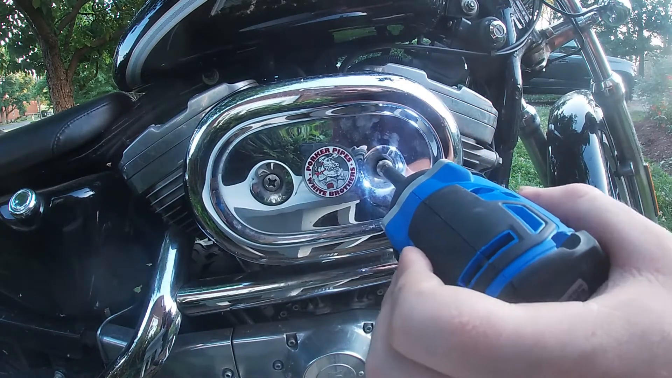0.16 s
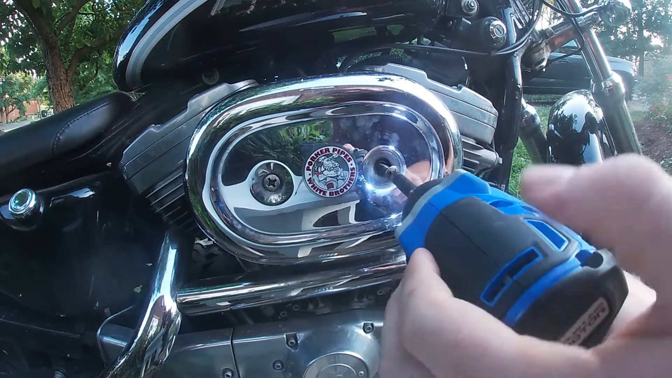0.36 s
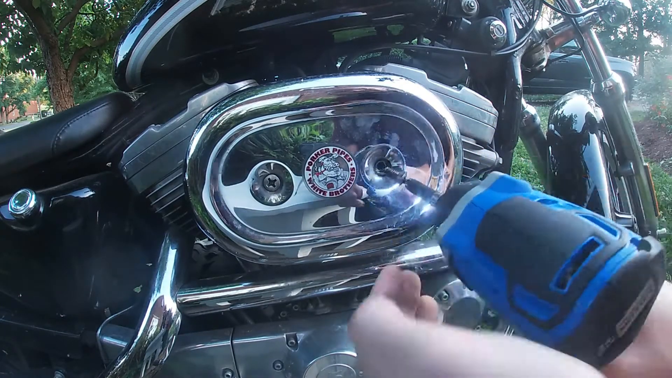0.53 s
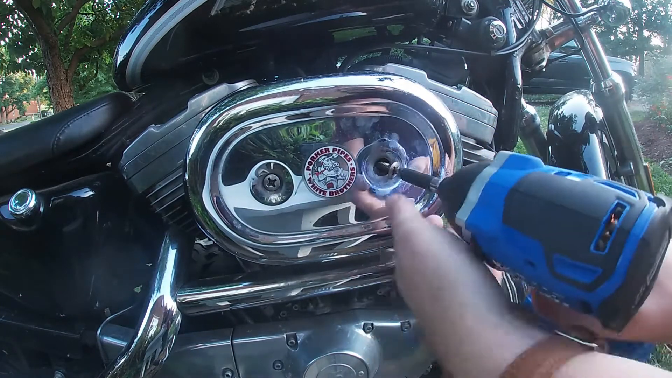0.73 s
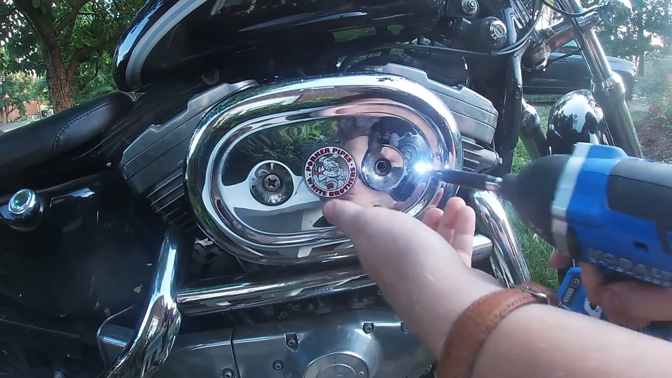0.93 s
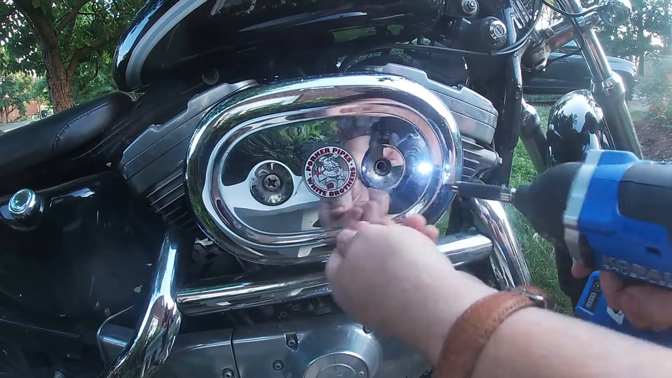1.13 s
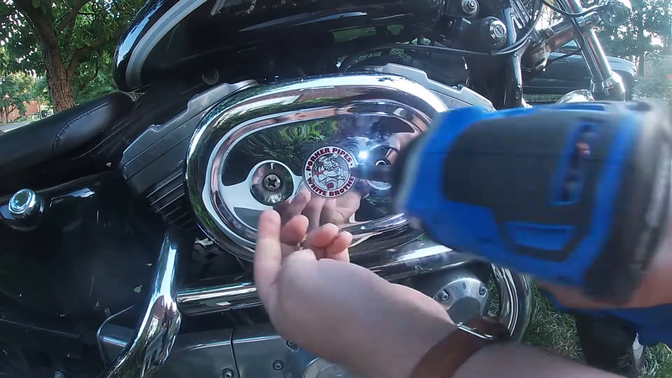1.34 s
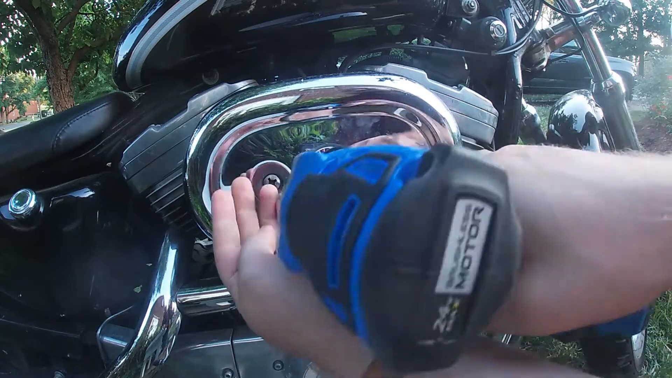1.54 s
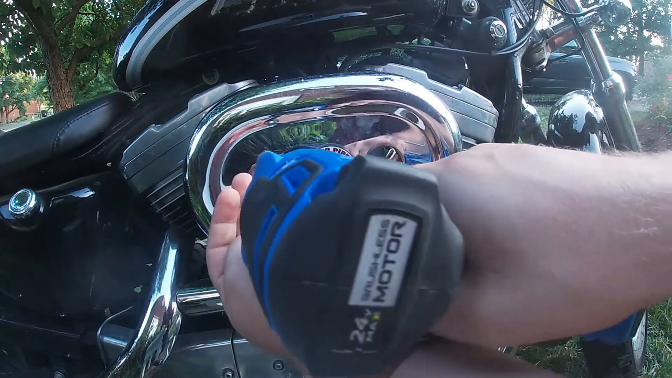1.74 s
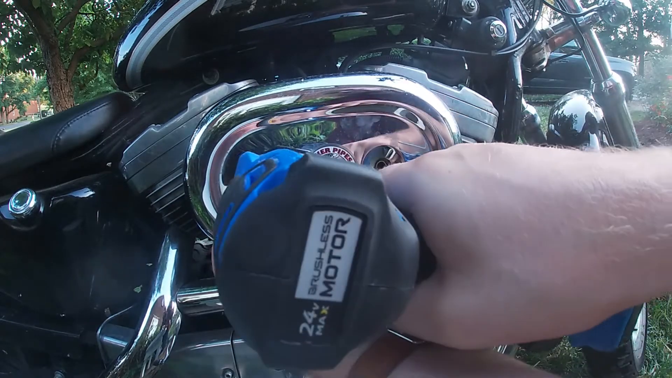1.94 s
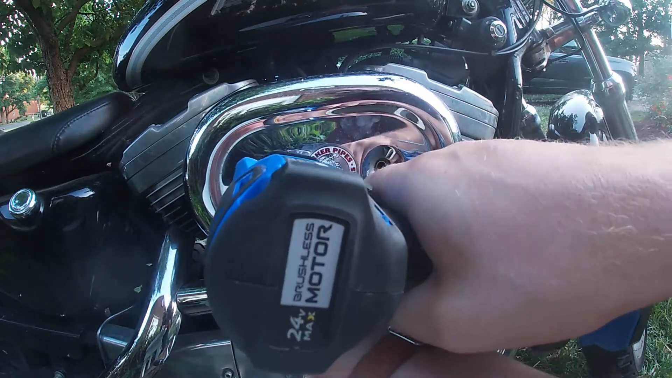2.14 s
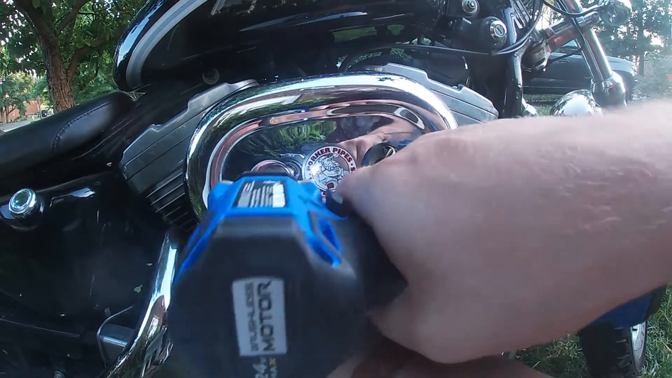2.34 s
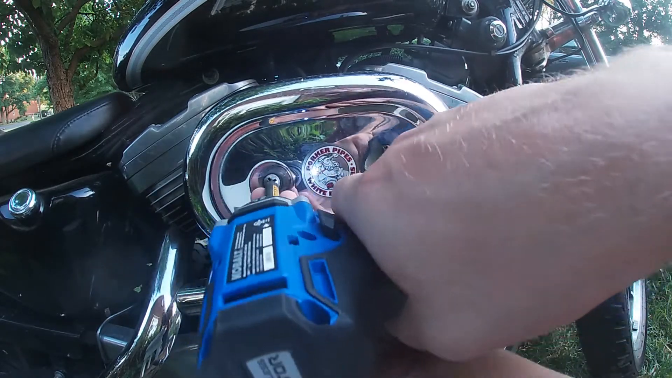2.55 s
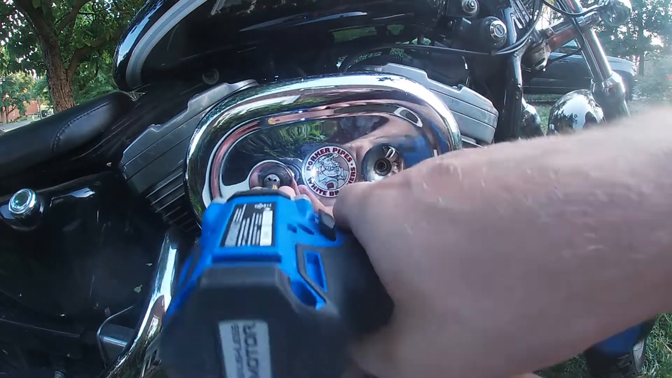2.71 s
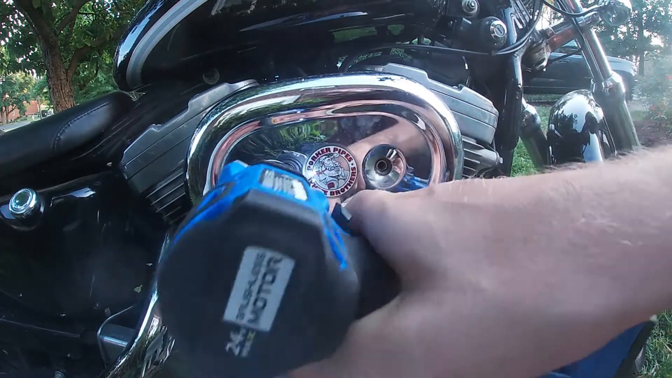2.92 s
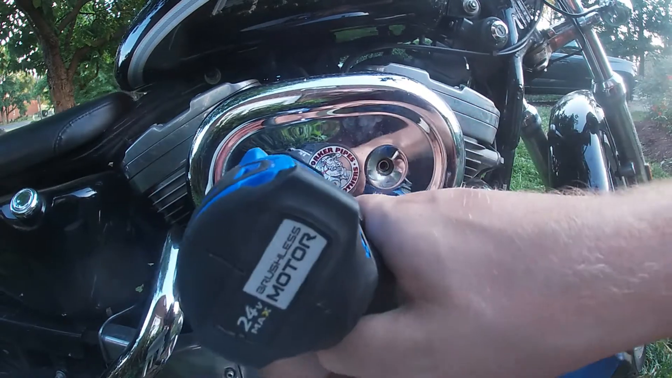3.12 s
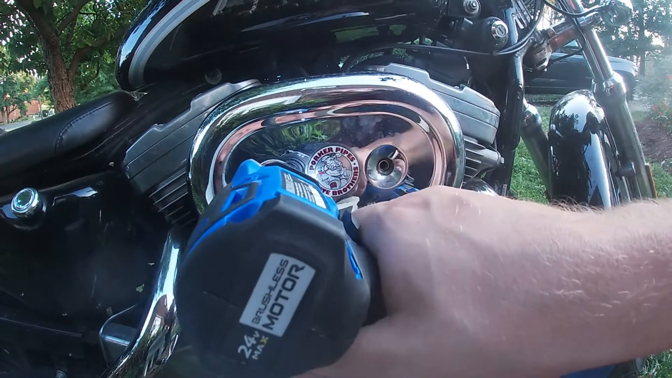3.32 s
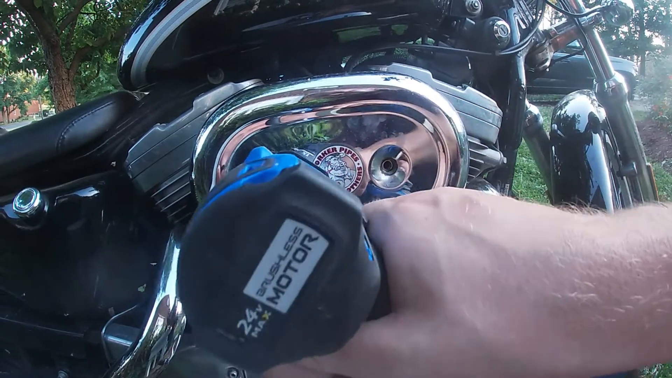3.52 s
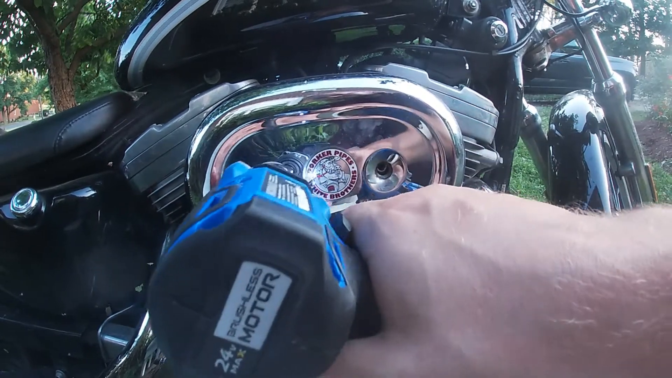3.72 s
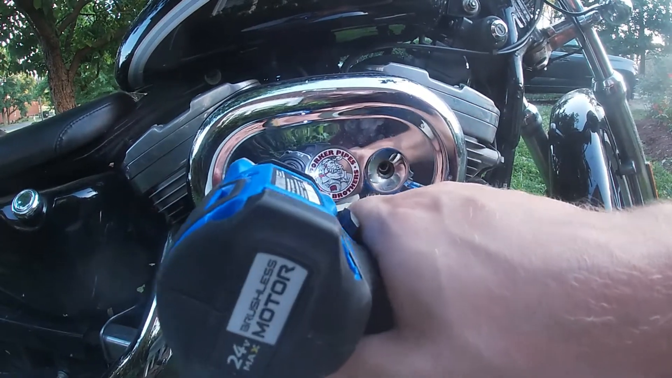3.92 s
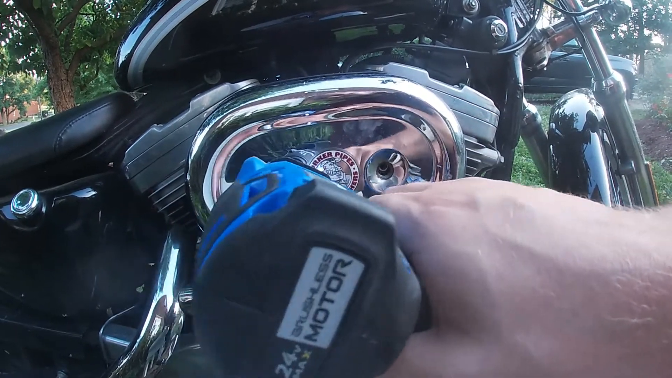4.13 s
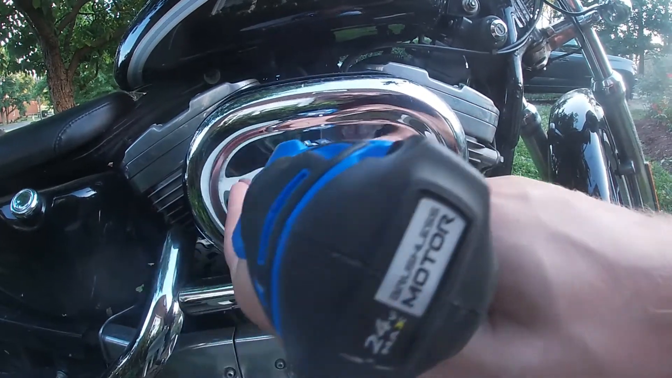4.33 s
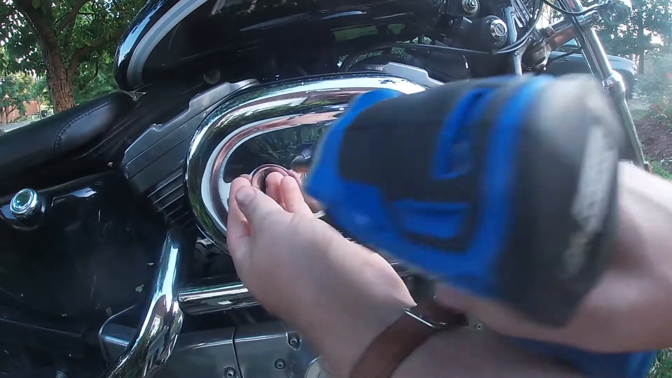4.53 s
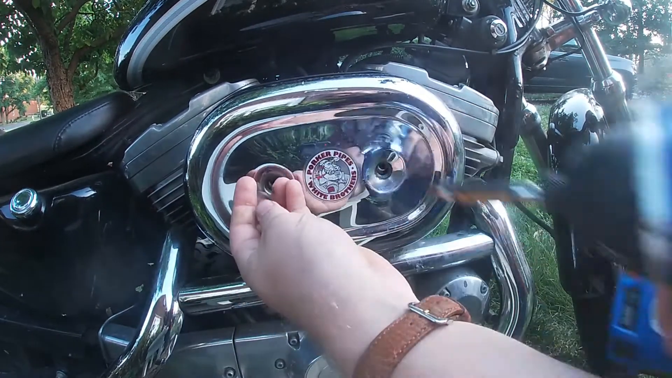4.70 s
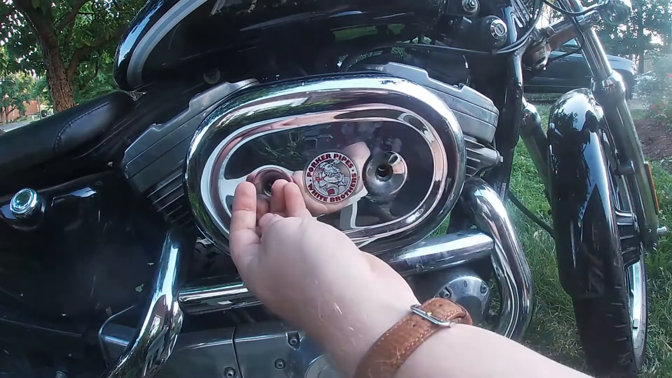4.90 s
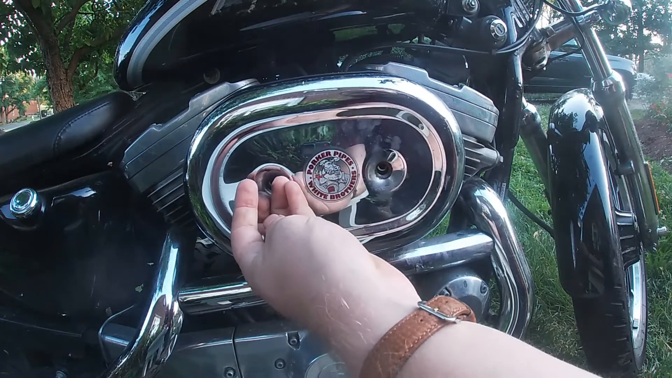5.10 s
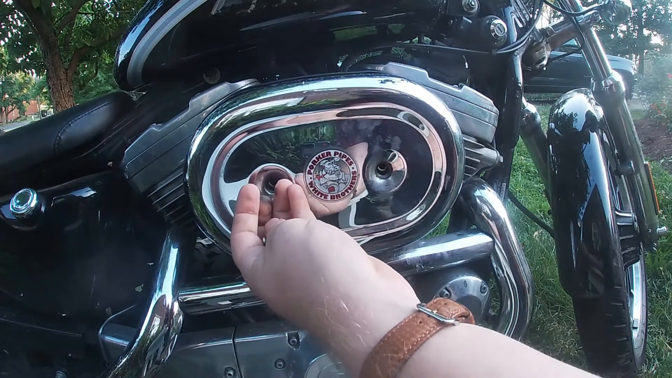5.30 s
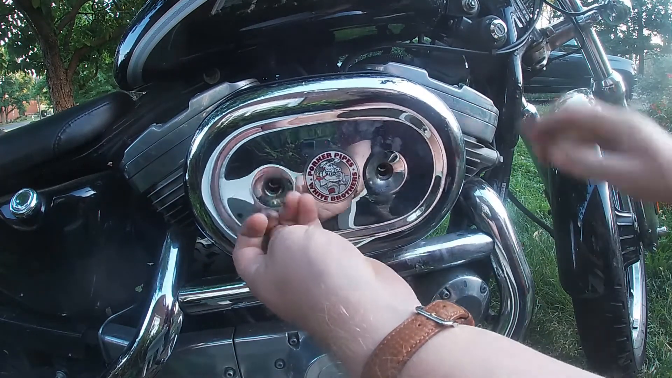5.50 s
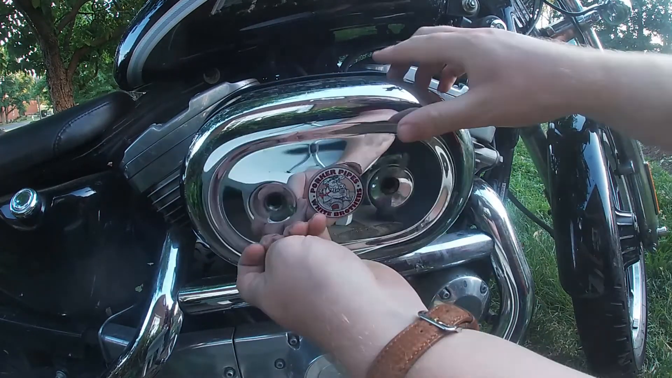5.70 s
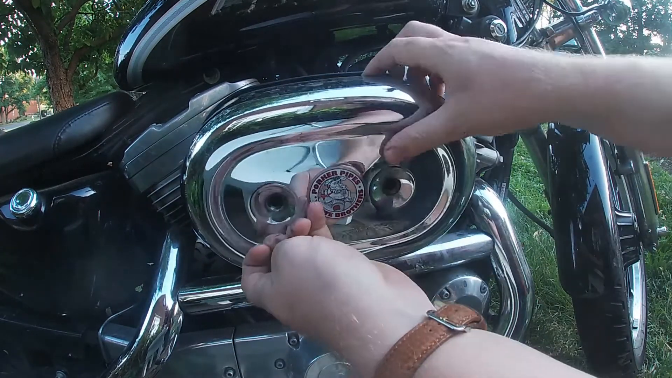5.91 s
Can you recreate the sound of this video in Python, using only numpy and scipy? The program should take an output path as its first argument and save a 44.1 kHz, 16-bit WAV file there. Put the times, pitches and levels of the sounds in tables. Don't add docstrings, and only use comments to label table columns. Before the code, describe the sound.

Close to a small microphone outdoors, a cordless driver buzzes with gritty gear rattle and a rising, sagging whine. The bit clinks and scrapes on a metal cover, then pauses among light knocks. Two more short bursts follow, broken by the hardest clanks and dull mount thumps. A freed bolt jingles faintly, then light handling ticks remain while a passing vehicle's roar swells. Traffic rumble and a few bird peeps lie behind.

```python
import sys
import numpy as np
from scipy import signal
from scipy.fft import rfft, irfft, next_fast_len
from scipy.io import wavfile
from scipy.ndimage import uniform_filter1d

SR = 44100
rng = np.random.default_rng(int(sys.argv[2]) if len(sys.argv) > 2 else 0)


def gain_from_decibels(decibels):
    exponent = np.asarray(decibels, float) / 20
    return 10 ** exponent


def wav_out(sig):
    wavfile.write(sys.argv[1], SR, np.round(np.clip(np.atleast_2d(sig).T, -1, 1) * 32767).astype(np.int16))


N = 266893

# (time [s], level [dB])
STREET_LEVEL = [(0, -48), (.08, -56.5), (.3, -47.5), (.65, -50.5), (.9, -48), (1.1, -50.5), (1.4, -46.5),
                (1.8, -47.5), (2.5, -47.5), (2.9, -44.5), (3.4, -44), (4.15, -46), (4.5, -71), (5, -58),
                (6.05, -54.5)]
# (frequency [Hz], density [dB per Hz])
RUMBLE_SPECTRUM = [(12, -74), (20, -8), (91, 2), (206, -4), (258, -6), (285, -4.5), (331, -28), (357, -40),
                   (400, -21.5), (520, -53), (880, -120)]
AIR_SPECTRUM = [(180, -10), (300, -7.5), (476, -4.5), (581, -17), (631, -6.5), (769, -5.5), (892, -2.5),
                (1330, -5.5), (2210, -13.5), (3400, -19.5), (4720, -24), (7500, -28), (15500, -63.5)]
# (time [s], frequency [Hz], level [dB rms])
FAR_ENGINE = [(1.0, 105, -65), (1.3, 118, -53.5), (1.9, 132, -47), (2.4, 135, -60.5), (3.1, 150, -60)]
# (time [s], peak [dB], frequency [Hz])
BUMPS = [(.001, -27.5, 201), (1.568, -23.5, 82), (1.563, -25, 302), (1.972, -30.5, 90), (3.198, -11.5, 88),
         (3.226, -12, 60.4), (3.243, -8.5, 80), (3.261, -9.5, 69), (3.285, -19.5, 86), (3.322, -25, 37.5),
         (3.554, -15.5, 221), (3.58, -11, 122), (3.589, -16, 71), (3.798, -26, 212), (3.814, -26, 37.7),
         (3.825, -28, 37.7), (3.848, -23.5, 37.5), (3.873, -22, 146), (3.885, -31, 37.7),
         (3.906, -21, 37.4), (3.936, -24, 250), (3.947, -11.5, 90), (.47, -30.5, 75.5), (4.06, -30, 62),
         (4.12, -31, 165), (4.27, -36.5, 160), (5.41, -24.5, 96), (5.865, -21.5, 83), (5.907, -23.5, 194)]
# (frequency [Hz], level [dB], ring time [factor])
COVER_MODES = [(430.5, -11.5, 2.36), (784, 1.5, 0.76), (1247, -10, 1.8), (1626, -4.5, 1.36),
               (2080, -2, 0.64), (2640, -0.5, 0.67), (3360, -15, 0.41), (4140, 5, 0.22), (4600, -25, 0.4),
               (5800, -8, 0.77), (8450, -12, 0.45), (9000, 3.5, 0.51), (11240, -18, 0.72)]
# (time [s], peak [dB], dullness [dB])
KNOCKS = [(.0014, -22, -15), (.0298, -37, -14), (.084, -30, -22), (.1206, -33, -11), (.564, -35, -1),
          (.5911, -31.5, -1), (.614, -41, 0.5), (.6963, -37.5, 5), (.7098, -24, -22), (.719, -38, 8),
          (.7254, -33, 13.5), (.7418, -34, -9), (.7448, -20.5, 3), (.7605, -17, -2), (.7746, -32, 19),
          (.7871, -21, 4.5), (.886, -34, -0.5), (.8992, -31, -3), (1.1449, -48, 8), (1.5606, -17.5, -0.5),
          (1.5844, -38, -10), (1.9061, -40.5, -11), (1.968, -17.5, 1), (1.9901, -42, 26),
          (2.1536, -27, -9.5), (2.5268, -39, -9)]
# (time [s], peak [dB], dullness [dB])
FUMBLES = [(2.941, -33.5, -13), (3.018, -52, 28), (3.0978, -27.5, 16.5), (3.1924, -20.5, -16.5),
           (3.2206, -22.5, -1), (3.457, -29, -36), (3.4973, -17.5, -24), (3.5108, -22, -28),
           (3.52, -8, -26), (3.5539, -8.5, -1), (3.842, -54, 8), (3.896, -26.5, -21), (3.9385, -18, -0.5),
           (4.233, -19.5, -8.5), (4.378, -38, -3), (4.392, -46, -14), (5.3748, -31.5, -10),
           (5.701, -37, -1), (5.7603, -45, 2), (5.8036, -34, 1), (6.0194, -46, -5)]
# (time [s], peak [dB], dullness [dB])
CLINKS = [(.4968, -12.5, -12), (.5084, -17.5, -5), (.535, -29, -3.5), (.842, -35, 0.5), (.928, -28, -9.5),
          (.9437, -9.5, -11.5), (1.0139, -4.5, -14), (2.2325, -23, -6.5), (2.8417, -32, -19),
          (3.252, -28, -29), (3.266, -34.5, -1), (3.47, -27, -22), (3.5609, -14.5, -5), (3.5704, -3, -16.5),
          (3.578, 2.5, -14), (3.5865, -5, -32), (3.6042, -11.5, -9), (3.6087, 1, -47), (3.874, -36, -19),
          (3.9161, -15, -27), (4.527, -44, -4), (4.6043, -29.5, -70)]
# (time [s], peak [dB], dullness [dB])
MORE_TICKS = [(1.157, -49, 7), (2.229, -36, -0.5), (2.235, -29, -11), (2.239, -34, 4.5), (2.325, -47, -19),
              (3.2248, -26.5, -10), (3.325, -50, -18), (3.527, -22, -18), (0.7797, -25, -7), (0.792, -28, -7),
              (.822, -42, -21), (3.616, -22, -13), (3.622, -18, -19), (4.36, -53, -14), (5.67, -51, -25),
              (5.845, -54, -30), (5.92, -54, -25), (3.868, -44, 5)]
# (time [s], rattle level [dB])
BURSTS = [
    [(.112, -48), (.125, -35), (.16, -27), (.21, -21.5), (.38, -18.5), (.445, -22.5), (.47, -32.5),
     (.492, -52)],
    [(3.494, -39), (3.524, -31.5), (3.535, -26.5), (3.56, -23), (3.62, -33), (3.7, -25), (3.795, -26),
     (3.812, -49), (3.83, -76)],
    [(3.912, -43), (3.93, -35), (3.97, -26.5), (4.04, -22.5), (4.2, -23), (4.24, -33.5), (4.28, -59.5),
     (4.39, -62)],
]
# (frequency [Hz], width [Hz], level [dB])
HOUSING_MODES = [(820, 70, -14), (1460, 80, -10), (2330, 90, -12), (2600, 90, -4), (3050, 170, 3),
                 (3650, 90, -2), (3880, 100, 0), (4250, 110, -7), (4900, 130, -6), (5450, 150, -14),
                 (9250, 600, -15)]
# (frequency [Hz], density [dB per Hz])
RATTLE_SPECTRUM = [(120, -44), (200, -8), (1480, -10), (1650, -9), (2600, 1.5), (3890, 5.5), (7900, -10.5),
                   (9300, -5.5), (10400, -15), (15700, -99)]
# (low start [dB], low end [dB], high [dB], hum start [dB], hum end [dB])
GRIPS = [
    (-16.5, -4.5, -14.5, -52, -25.5),
    (-6, -7.5, -15, -12, -11.5),
    (-7.5, -2.5, -17, -15, -11.5),
]
STALL_DB = (-8, 1, 0)
STALL_WIDTHS_HZ = (800, 330, 200)
# (frequency [Hz], width [Hz], level [dB])
FAVOURED_MODES = [
    (2760, 100, -32),
    (4140, 510, -15.5),
    (2630, 930, -2.5),
]
JINGLE_DB = (-29, -24, -7)
# (start [s], length [s], first [Hz], last [Hz], level [dB rms])
WHISTLES = [
    (.118, .06, 15780, 15400, -70),
    (3.5, .075, 15780, 15300, -66),
    (3.925, .08, 15760, 15150, -66),
    (4.01, .12, 15000, 14500, -72),
]
# (time [s], frequency [Hz])
MESH_SPEEDS = [
    [(.17, 1700), (.205, 2460), (.228, 3030), (.256, 3460), (.29, 3740), (.33, 3790), (.4, 3250),
     (.443, 2910), (.46, 2990)],
    [(3.61, 2800), (3.635, 3300), (3.657, 3680), (3.69, 3450), (3.732, 3060), (3.755, 2820), (3.79, 2550)],
    [(3.985, 2050), (4.002, 2450), (4.022, 3050), (4.045, 3650), (4.07, 4020), (4.11, 3950), (4.16, 3560),
     (4.22, 3200)],
]
# (speeding up [dB], half way [dB], running down [dB], higher order [dB], sides [dB])
MESH_FORCES = [
    (-38, -32.5, -37.5, -17, -6),
    (-46, -40, -42, -40, -6),
    (-31, -39, -41, -42, -4),
]
# (multiple [1], level [dB rms])
SIDE_ORDERS = [(.66, -50), (.76, -50), (1.235, -43), (1.33, -43)]
# (time [s], peak [dB], frequency [Hz])
RINGS = [(0.509, -38, 2640), (0.59, -35, 2640), (1.014, -18, 2080), (1.0155, -18.5, 3050),
         (1.561, -16.5, 739), (1.968, -19.5, 1562), (1.969, -24, 402), (1.991, -27, 408), (2.195, -37, 855),
         (2.213, -27, 838), (2.235, -29, 1610), (2.278, -28, 370), (3.099, -26, 867), (3.196, -28, 1173),
         (3.22, -18.5, 1265), (3.237, -24, 1195), (3.261, -30.5, 1067), (3.867, -32.5, 1190),
         (3.098, -24, 400), (3.018, -39, 800), (3.125, -36, 350), (3.222, -23, 431), (3.265, -24, 331),
         (3.553, -8.5, 407), (3.584, -17.5, 293), (3.936, -15, 1173), (4.395, -30.5, 498),
         (4.518, -31.5, 424), (4.743, -19, 482), (5.156, -26.5, 447)]
# (start [s], length [s], level [dB rms])
SCRAPE = (.7, 0.12, -29)
# (frequency [Hz], density [dB per Hz])
SCRAPE_SPECTRUM = [(220, -35), (320, -4), (850, 9.5), (1200, -17), (3000, -17), (6000, -53)]
# (start [s], length [s], level [dB rms])
BRUSHES = [(2.151, 0.0082, -51), (2.835, 0.034, -53), (3.469, 0.013, -50), (4.516, 0.03, -57),
           (4.599, 0.015, -41), (5.69, 0.045, -65), (5.79, 0.02, -68), (5.84, 0.022, -72), (6.0, 0.03, -57),
           (4.37, .05, -58.5), (4.25, .05, -58)]
# (frequency [Hz], density [dB per Hz])
BRUSH_SPECTRUM = [(1500, -25), (2500, -8), (4500, 8), (7500, 2), (10000, -14), (14000, -26)]
# (time [s], peak [dB], frequency [Hz], T60 [s])
CHIMES = [(0.944, -40, 6000, .07), (4.245, -38, 2320, .16), (4.25, -54, 3900, .2), (4.23, -41, 2600, .25),
          (4.25, -68, 7750, .15), (4.395, -59, 3740, .7), (4.388, -43, 2310, .11), (4.382, -56, 4850, .17),
          (4.382, -56, 5450, .17), (5.702, -50, 4500, .06), (5.756, -44, 3000, .05),
          (4.382, -58, 5100, .17), (4.39, -59, 5750, .18), (4.38, -63, 6050, .2), (4.29, -60, 3700, .4),
          (4.525, -56, 5300, .08), (4.525, -54, 2500, .06), (5.712, -52, 4720, .09),
          (5.703, -61, 7600, .025), (5.798, -58, 7700, .03), (5.8, -72, 10700, .06),
          (5.842, -73, 9600, .09), (5.845, -70, 7050, .12), (6.012, -62, 9100, .04),
          (5.705, -52, 3050, .12), (6.015, -44, 1650, .2), (6.02, -50, 3000, .1), (6.022, -56, 4200, .08),
          (5.8, -50, 2300, .05), (5.98, -44, 1100, .04), (4.25, -53, 3080, .2), (4.29, -55, 2050, .3),
          (4.25, -58, 5450, .2), (5.8, -72, 9600, .08), (4.24, -56, 5900, .2)]
# (start [s], length [s], first [Hz], last [Hz], level [dB rms])
PEEPS = [
    (1.79, 0.048, 6900, 7130, -65),
    (1.878, 0.035, 6760, 6800, -65),
    (2.66, 0.037, 6850, 7500, -60),
    (3.014, 0.044, 8450, 8300, -69),
    (3.08, 0.16, 9000, 10900, -81),
]
# (time [s], nearness [dB])
NEARNESS = [
    (4.2, -9.5),
    (4.44, -9),
    (4.73, -2.5),
    (5.0, 0.8),
    (5.48, -1.5),
    (6.05, 0.3),
]
# (level when near [dB], share of nearness [1])
VEHICLE_LAYERS = [
    (-38.5, 2),
    (-37.5, 0.61),
    (-41, 0.93),
    (-54.5, 1.55),
]
# (frequency [Hz], density [dB per Hz])
THUD_SPECTRUM = [(12, -37), (20, -6), (48, -9), (75, 7), (89, 0.5), (140, -30), (180, -46), (310, -120)]
BOOM_SPECTRUM = [(76, -24), (130, -3.5), (146, -7), (221, 1), (253, -4), (330, -12.5), (430, -85),
                 (730, -120)]
ROAR_SPECTRUM = [(180, -11), (300, -21), (361, -1.5), (991, -2.5), (1240, -9.5), (1350, -5.5), (2700, -18),
                 (3510, -31), (5940, -120)]
HISS_SPECTRUM = [(1410, -63), (2400, 4), (3410, -2), (3810, -1.5), (4370, -8), (5490, -7), (6290, -25),
                 (10500, -70), (13600, -88), (22000, -120)]
# (frequency [Hz], width [Hz], level when near [dB])
SQUEAL_BANDS = [(3830, 58, -76), (5400, 120, -76), (5830, 140, -76)]
# (start [s], length [s], level [dB rms])
INSECT_BUZZES = [
    (4.74, .18, -81),
    (5.196, .36, -82),
]


def evened(x):
    return x / np.sqrt(np.mean(x ** 2) + 1e-20)


def coloured(x, points):
    f, db = np.transpose(points)
    size = next_fast_len(len(x) + 2048)
    hz = np.fft.rfftfreq(size, 1 / SR)
    gain = gain_from_decibels(np.interp(np.log(hz + 1), np.log(f), db, -120, -120))
    return irfft(rfft(x, size) * gain, size)[:len(x)]


def resonate(x, hz, width_hz):
    r = np.exp(-np.pi * width_hz / SR)
    poles = [1, -2 * r * np.cos(2 * np.pi * hz / SR), r * r]
    return signal.lfilter([(1 - r * r) / 2, 0, -(1 - r * r) / 2], poles, x)


def resonate_twice(x, hz, width_hz):
    return resonate(resonate(x, hz, width_hz), hz, width_hz)


def straying(x, hz, width_hz):
    turn = np.exp(2j * np.pi * np.cumsum(hz) / SR)
    r = np.exp(-np.pi * width_hz / SR)
    return 2 * (turn * signal.lfilter([1 - r], [1, -r], x / turn)).real


def band(x, order, edges_hz, kind):
    return signal.sosfilt(signal.butter(order, edges_hz, kind, fs=SR, output="sos"), x)


def played(rows):
    s, *columns = np.transpose(rows)
    t = np.arange(s[0], s[-1], 1 / SR)
    return s[0], [np.interp(t, s, c) for c in columns]


def smoothed_twice(x, span_s):
    span = int(span_s * SR)
    return uniform_filter1d(uniform_filter1d(x, span), span)


def drift(count, span_s):
    return evened(smoothed_twice(rng.standard_normal(count), span_s))


def wavering(points, db, lumpy_db, span_s):
    noise = evened(coloured(rng.standard_normal(len(db)), points))
    return noise * gain_from_decibels(db + lumpy_db * drift(len(db), span_s))


def glide(s, length_s, hz, last_hz, db, husk):
    hz = np.linspace(hz, last_hz, int(length_s * SR))
    tone = np.sin(2 * np.pi * np.cumsum(hz * (1 + husk * drift(len(hz), 0.0045))) / SR)
    return s, gain_from_decibels(db) * tone * signal.windows.tukey(len(hz), .3)


def add(mix, s, sound):
    part = mix[max(round(s * SR), 0):][:len(sound)]
    part += sound[:len(part)]


def street():
    rumble_db = np.interp(np.arange(N) / SR, *np.transpose(STREET_LEVEL))
    air_db = rumble_db - 4.5
    return wavering(RUMBLE_SPECTRUM, rumble_db, 0.33, 0.035) + wavering(AIR_SPECTRUM, air_db, 0.19, 0.019)


def bump(s, db, hz):
    t60_s, sag_per_s, rise_s = 0.068, 1.5, .004
    t = np.arange(int(.2 * SR)) / SR
    swing = np.sin(2 * np.pi * hz * t * (1 - sag_per_s * t)) * gain_from_decibels(db + 2 - 60 * t / t60_s)
    return s, swing * np.minimum(t / rise_s, 1)


def knock(s, db, dull_db, top_db, luck):
    low_db = db + dull_db
    mid_db = db - 6 + 0.56 * dull_db
    high_db = db + top_db - 0.0529 * (db + 19.5)
    t = np.arange(int(.16 * SR)) / SR
    hz, mode_db, ring_factor = np.transpose(COVER_MODES)[:, :, None]
    share, detune, phase = luck[:, :, None]
    t60_s = np.clip(0.041 + 0.0012 * dull_db, .015, .046)
    mode_db = mode_db - .7 * max(dull_db - 4, 0)
    decay = gain_from_decibels(mode_db - 1.0 + 2.5 * share - 60 * t / (ring_factor * t60_s))
    modes = decay * np.sin(2 * np.pi * (hz * (1 + 0.051 * detune) * t + phase))
    snap = 2.7 * gain_from_decibels(-60 * t / 0.0019)
    body = 2.32 * gain_from_decibels(-60 * t / (.5 * t60_s))
    tail = 0.5 * gain_from_decibels(-60 * t / (2.95 * t60_s))
    crack = rng.standard_normal(len(t)) * (snap + body + tail)
    rise_s = 0.00047 + .00008 * max(dull_db - 1.5, 0)
    blow = (modes.sum(0) + crack) * np.minimum(t / rise_s, 1)
    thin_db = 1.1 * min(dull_db, 0)
    shape = [(150, low_db - 6.5 + 2 * thin_db), (330, low_db + 6.5 + thin_db),
             (480, low_db + 0.5 + 0.19 * thin_db), (850, low_db - 5.5), (1200, mid_db), (2600, mid_db),
             (3400, db - 8), (6200, db - 17.5),
             (8000, high_db - 3), (11000, high_db - 13.0), (15500, high_db - 29)]
    lead = 128
    return s - lead / SR, coloured(np.append(np.zeros(lead), blow), shape)


def rattle(rows, grip, stall_db, stall_width_hz, favoured, jingle_db):
    s, (db,) = played(rows)
    count = len(db)
    low_start_db, low_end_db, high_db, hum_start_db, hum_end_db = grip
    low_db = np.linspace(low_start_db, low_end_db, count)
    hum_db = np.linspace(hum_start_db, hum_end_db, count)

    teeth_per_s = 4000
    force = gain_from_decibels(2.0 * np.minimum(rng.exponential(1, count), 4))
    clicks = rng.standard_normal(count) * force * (rng.random(count) < teeth_per_s / SR)
    drive = 0.68 * evened(clicks) + 0.7 * rng.standard_normal(count)
    drive = drive * gain_from_decibels(drift(count, 0.0073))

    shake = evened(smoothed_twice(clicks, .03))
    rung = np.zeros(count)
    for k, (hz, width_hz, mode_db) in enumerate(HOUSING_MODES):
        rung += gain_from_decibels(mode_db) * straying(drive, hz * (1 + .018 * np.roll(shake, 1700 * k)), width_hz)
    rung = band(rung, 4, 10500, "low")
    body = evened(coloured(drive, RATTLE_SPECTRUM)) + .6 * evened(rung)

    low = evened(band(body, 3, 1900, "low"))
    mid = evened(band(body, 3, (1900, 6200), "band"))
    high = evened(band(body, 3, 6200, "high"))
    hum = evened(resonate_twice(drive, 462, 96))
    stall_s = 0.062
    stall = 1 / (1 + (np.arange(count) / SR / stall_s) ** 6)
    mid += gain_from_decibels(stall_db) * stall * evened(resonate_twice(drive, 3060, stall_width_hz))
    high *= gain_from_decibels(-5 * stall)
    mid += gain_from_decibels(jingle_db) * np.linspace(0, 1, count) * evened(resonate_twice(drive, 5700, 830))
    hz, width_hz, favoured_db = favoured
    mid += gain_from_decibels(favoured_db) * np.linspace(.3, 1.3, count) * evened(resonate_twice(drive, hz, width_hz))
    total = mid + gain_from_decibels(low_db) * low + gain_from_decibels(high_db) * high + gain_from_decibels(hum_db) * hum
    return s, gain_from_decibels(db) * total * signal.windows.tukey(count, .04)


def controller_whistle(*row):
    return glide(*row, husk=0.0022)


def whine(rows, up_db, half_db, down_db, upper_db, side_db):
    swell_hz, swell_width_hz, swell_db, db_per_octave = 3030, 300, 16, 9
    s, (hz,) = played(rows)
    hz = uniform_filter1d(hz, 500, mode="nearest")
    count = len(hz)
    off = (hz - swell_hz) / swell_width_hz
    force_db = np.interp(np.linspace(0, 2, count), range(3), (up_db, half_db, down_db))
    db = force_db + swell_db / (1 + off ** 2) + db_per_octave * np.log2(hz / swell_hz)
    turns = 2 * np.pi * np.cumsum(hz * (1 + 0.001 * drift(count, 0.0035))) / SR
    upper = resonate_twice(np.sin(1.22 * turns), 2980, 560) * gain_from_decibels(upper_db)

    flutter = evened(uniform_filter1d(np.gradient(np.gradient(turns)), 200))
    pull_db, pull_hz_per_s = 8, 4000
    side_db = side_db + pull_db * np.tanh(np.gradient(hz) * SR / pull_hz_per_s)
    for k, (multiple, order_db) in enumerate(SIDE_ORDERS):
        flutter_db = 3 + 3 * np.tanh(np.roll(flutter, 900 * k))
        upper += gain_from_decibels(order_db + side_db + flutter_db) * np.sin(multiple * turns)
    tone = np.sqrt(2) * gain_from_decibels(db + 1.5 * drift(count, 0.003)) * np.sin(turns)
    return s, (tone + upper) * signal.windows.tukey(count, .1)


def ring(s, db, hz):
    t60_s = 0.049 * (1000 / hz) ** 0.48
    t = np.arange(int(np.clip(t60_s, .02, 1) * SR)) / SR
    waver = gain_from_decibels(3.5 * drift(len(t), 0.001))
    rise = np.minimum(t * hz / 1.8, 1)
    return s, np.sin(2 * np.pi * hz * t) * gain_from_decibels(db - 60 * t / t60_s) * waver * rise


def scrape(s, length_s, db, spectrum):
    count = int(length_s * SR)
    drag = np.sin(np.pi * np.linspace(0, 1, count) ** 1.34) ** 2
    return s, drag * wavering(spectrum, np.full(count, db), 3.4, 0.003)


def chime(s, db, hz, t60_s):
    t = np.arange(int(t60_s * SR)) / SR
    blur = evened(resonate_twice(rng.standard_normal(len(t)), hz, 40 + 6 / t60_s))
    return s, blur * gain_from_decibels(db + 3.5 - 60 * t / t60_s) * np.minimum(t / 0.0032, 1)


def far_engine():
    s, (hz, db) = played(FAR_ENGINE)
    tone = np.sin(2 * np.pi * np.cumsum(hz * (1 + 0.031 * drift(len(hz), 0.036))) / SR)
    return s, tone * gain_from_decibels(db + 5.0 + 1.6 * drift(len(hz), 0.0051))


def bird_peep(*row):
    return glide(*row, husk=0.015)


def vehicle():
    s, (near_db,) = played(NEARNESS)
    thud_db, boom_db, roar_db, hiss_db = (db + share * near_db for db, share in VEHICLE_LAYERS)
    out = wavering(THUD_SPECTRUM, thud_db, 0.44, 0.071)
    out += wavering(BOOM_SPECTRUM, boom_db, 2.26, 0.036)
    out += wavering(ROAR_SPECTRUM, roar_db, 0.33, 0.02)
    out += wavering(HISS_SPECTRUM, hiss_db, 1.0, 0.013)
    return s, out * np.minimum(np.arange(len(out)) / 2500, 1)


def murmur():
    s, (near_db,) = played(NEARNESS)
    count = len(near_db)
    noise = rng.standard_normal(count)
    out = np.zeros(count)
    for hz, width_hz, db in SQUEAL_BANDS:
        out += gain_from_decibels(db + .6 * near_db + 4.5 * drift(count, 0.13)) * evened(resonate(noise, hz, width_hz))
    grass_spectrum = [(7000, -10), (9500, -3), (12200, 3), (12900, -25)]
    out += wavering(grass_spectrum, np.full(count, -96), 2.5, 0.011)
    return s, out * np.minimum(np.arange(count) / 4000, 1)


def insect(s, length_s, db):
    count = int(length_s * SR)
    buzz = evened(resonate_twice(rng.standard_normal(count), 12100, 900))
    return s, gain_from_decibels(db) * signal.windows.tukey(count, .6) * buzz


def yard(x):
    t60_s, gap_s, density = 0.15, .004, .06
    t = np.arange(int(.25 * SR)) / SR
    signs = rng.choice([-1., 1.], len(t)) * (rng.random(len(t)) < density)
    taps = signs * gain_from_decibels(-60 * t / t60_s) * (t > gap_s)
    return signal.fftconvolve(x, taps / np.linalg.norm(taps))[:N]


def scene():
    tool, far = np.zeros(N), street()
    for row in BUMPS:
        add(far, *bump(*row))
    clink_top_db, knock_top_db = -18.5, -29
    for rows, top_db in ((CLINKS, clink_top_db), (KNOCKS, knock_top_db),
                         (FUMBLES, knock_top_db), (MORE_TICKS, clink_top_db)):
        for row in rows:
            luck = rng.standard_normal((3, len(COVER_MODES)))
            add(tool, *knock(*row, top_db, luck))
    for burst in zip(BURSTS, GRIPS, STALL_DB, STALL_WIDTHS_HZ, FAVOURED_MODES, JINGLE_DB):
        add(tool, *rattle(*burst))
    for row in WHISTLES:
        add(tool, *controller_whistle(*row))
    for rows, force in zip(MESH_SPEEDS, MESH_FORCES):
        add(tool, *whine(rows, *force))
    for row in RINGS:
        add(tool, *ring(*row))
    add(tool, *scrape(*SCRAPE, SCRAPE_SPECTRUM))
    for row in BRUSHES:
        add(tool, *scrape(*row, BRUSH_SPECTRUM))
    for row in CHIMES:
        add(tool, *chime(*row))
    add(far, *far_engine())
    for row in PEEPS:
        add(far, *bird_peep(*row))
    add(far, *vehicle())
    add(far, *murmur())
    for row in INSECT_BUZZES:
        add(far, *insect(*row))
    return np.tile(tool + gain_from_decibels(-18.0) * yard(tool) + far, (2, 1))


def low_pass(x):
    return signal.sosfilt(signal.butter(12, 15790, fs=SR, output="sos"), x)


def record(dry):
    loudness = uniform_filter1d(abs(dry[0]), 100)
    rough = dry[0] * (1 + (loudness / 0.13) ** 2) * rng.standard_normal(N)
    trace = coloured(rough, [(1200, -50.5), (4000, -46.0), (12000, -55.0), (15700, -36.0)])
    hiss_spectrum = [(8000, -13), (12500, -7), (15700, -26.0)]
    hiss = np.array([evened(coloured(v, hiss_spectrum)) for v in rng.standard_normal((2, N))])
    mix = np.clip(dry, -.95, .95) + trace * [[1], [-1]] + gain_from_decibels(-93.0) * hiss
    return low_pass(mix)


dry = scene()
out = record(dry)
wav_out(out)
```